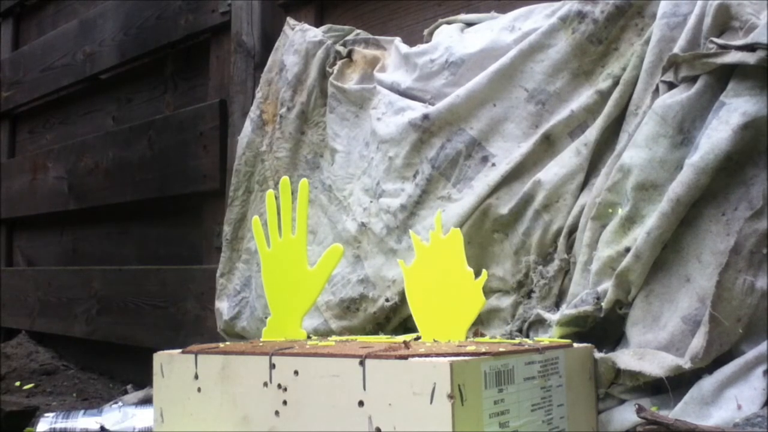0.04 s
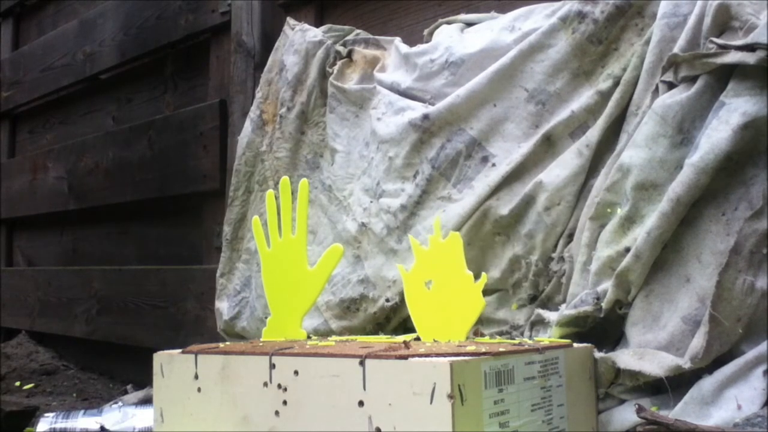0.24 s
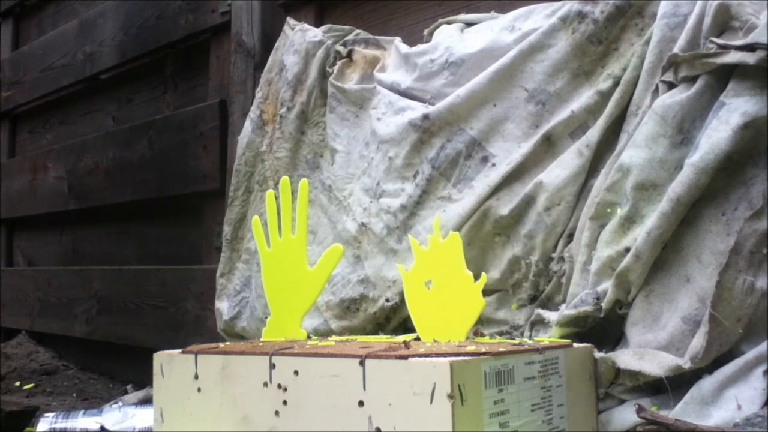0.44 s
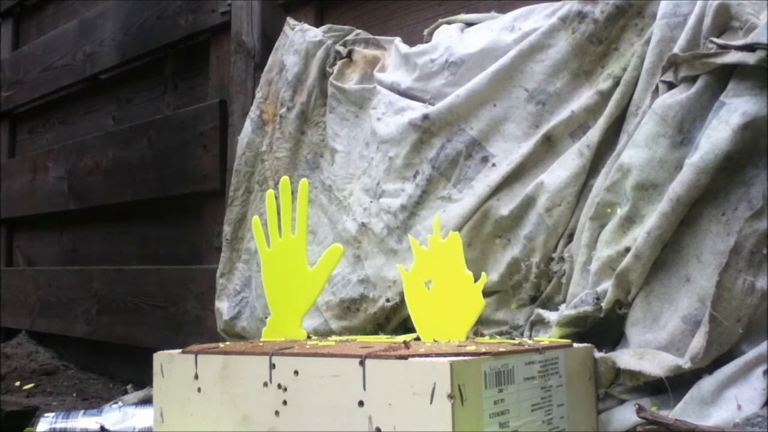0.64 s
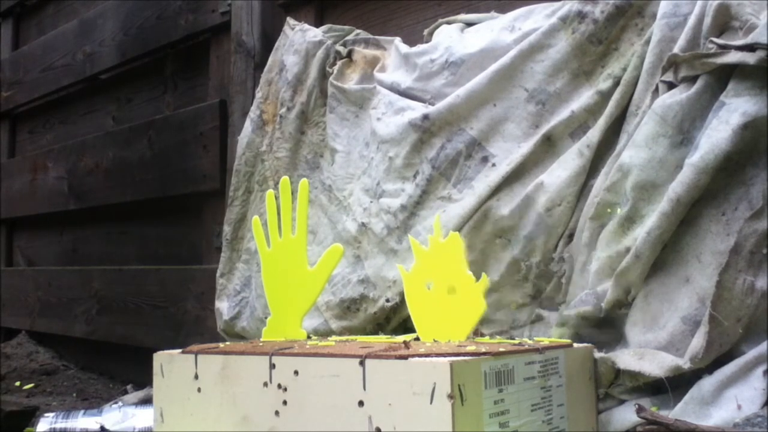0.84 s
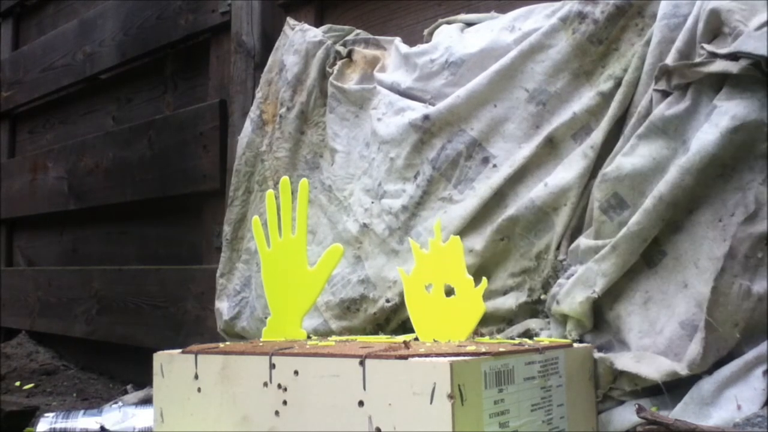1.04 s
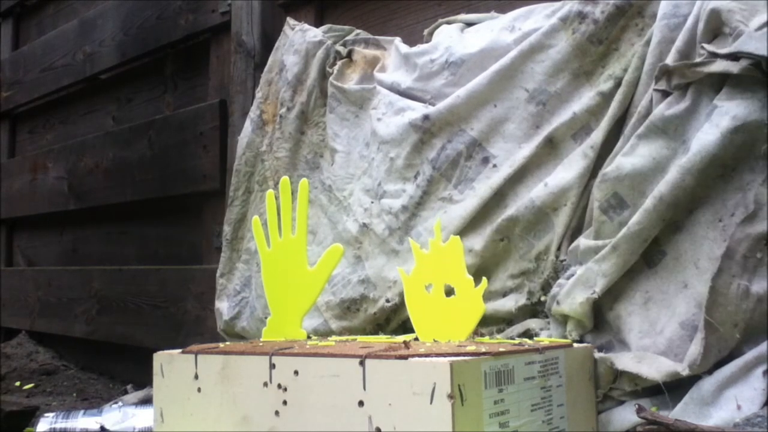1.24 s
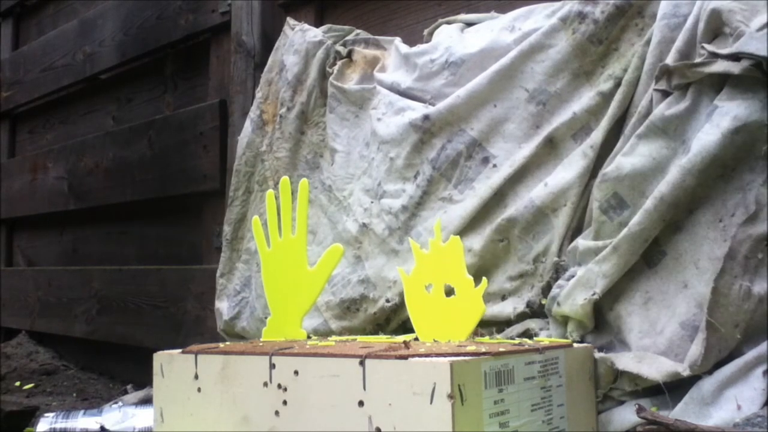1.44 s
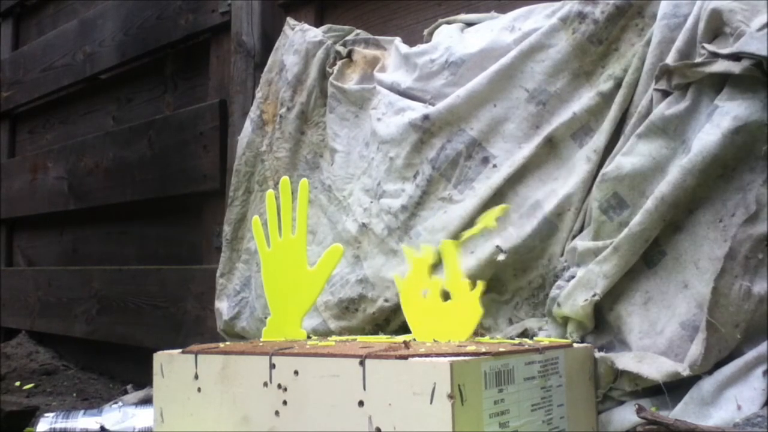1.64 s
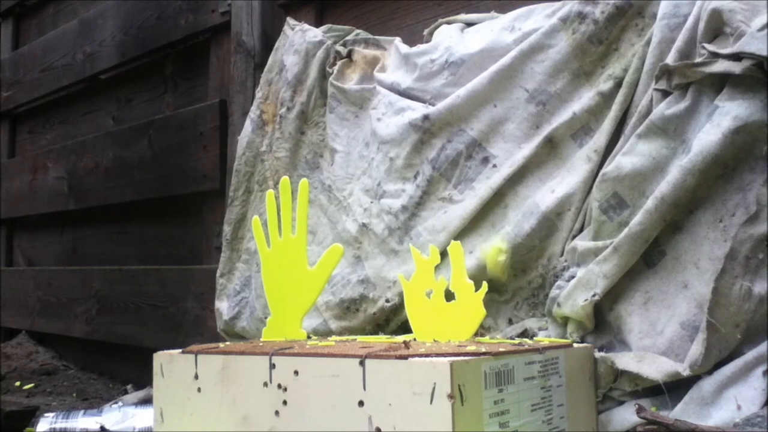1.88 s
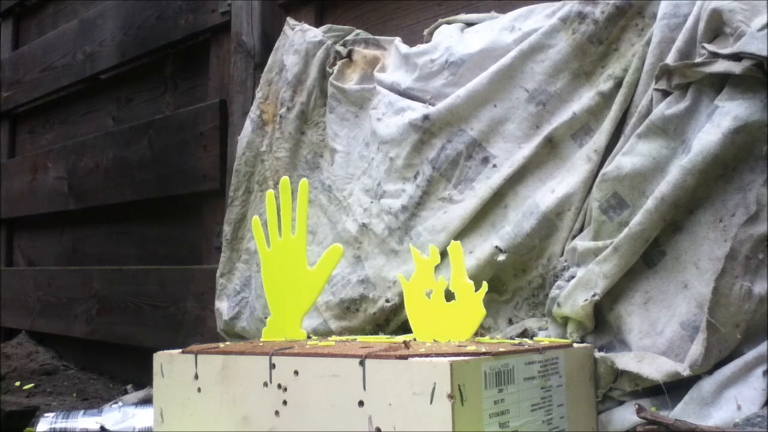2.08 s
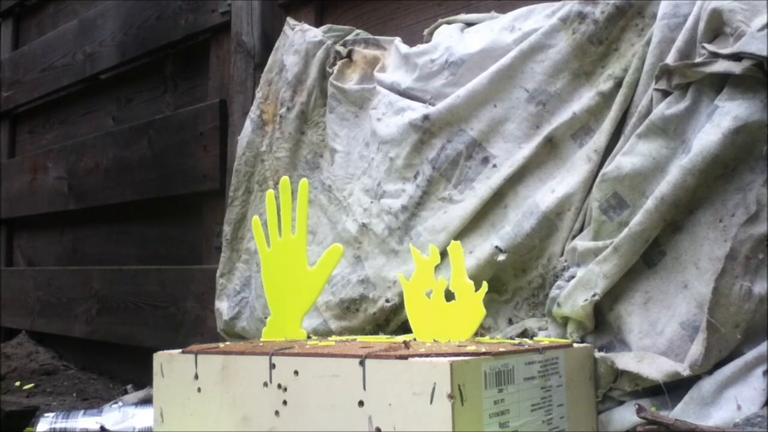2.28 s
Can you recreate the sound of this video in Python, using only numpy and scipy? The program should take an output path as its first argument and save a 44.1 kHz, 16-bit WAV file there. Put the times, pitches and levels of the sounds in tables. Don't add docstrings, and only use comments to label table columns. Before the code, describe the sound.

Air gun fires three times in a fenced yard, each snap smacking plastic and thumping a box

```python
import sys
import numpy as np
from scipy import signal
from scipy.fft import rfft, irfft, next_fast_len
from scipy.io import wavfile
from scipy.ndimage import uniform_filter1d, map_coordinates

SR = 44100
rng = np.random.default_rng(int(sys.argv[2]) if len(sys.argv) > 2 else 0)


def log_audio(samples):
    frames = np.atleast_2d(samples).T
    limited = np.clip(frames, -1, 1)
    pcm = np.round(limited * 32767).astype(np.int16)
    wavfile.write(sys.argv[1], SR, pcm)


def magnitude_from_level(level_db):
    exponent = np.asarray(level_db, float) / 20
    return 10 ** exponent


N = 101430


def unit(x):
    return x / np.sqrt(np.mean(x ** 2) + 1e-20)


def along(points, hz):
    f, value = np.transpose(points)
    return np.interp(np.log(hz + 1), np.log(f + 1), value)


def filtered(x, response):
    size = x.shape[-1]
    m = next_fast_len(size + 8192)
    spectrum = rfft(x, m) * response(np.fft.rfftfreq(m, 1 / SR))
    return irfft(spectrum, m)[..., :size]


def noise(spectrum, size):
    return unit(filtered(rng.standard_normal(size), lambda hz: magnitude_from_level(along(spectrum, hz))))


def narrow(hz, width_hz, size):
    peak = lambda f: 1 / (1 + ((f - hz) / (width_hz / 2)) ** 2)
    return unit(filtered(rng.standard_normal(size), peak))


def fade(t, t60, rise_s):
    return magnitude_from_level(-60 * t / t60) * (1 - np.exp(-t / rise_s))


def ring(modes, t, rise_s, scatter_db):
    out = np.zeros(len(t))
    for hz, db, t60 in modes:
        level = magnitude_from_level(db + scatter_db * rng.normal())
        out += level * fade(t, t60, rise_s) * np.sin(2 * np.pi * hz * t)
    return out


def add(track, s, sound):
    part = track[round(s * SR):][:len(sound)]
    part += sound[:len(part)]


# (frequency [Hz], level [dB])
SPRING_SPECTRUM = [(60, -19.5), (300, -7), (2700, -6.5), (3800, -2), (6300, -8.5), (7400, -10.5),
                   (9800, -12), (15500, -15.5)]


def spring(t):
    return magnitude_from_level(-15) * fade(t, t60=0.16, rise_s=0.0021) * noise(SPRING_SPECTRUM, size=len(t))


def muzzle_pop(t):
    u = t / .00006
    return magnitude_from_level(-2.5) * (u - 2) * u * np.exp(-u) * 2


def barrel_puff(t):
    return ring([(110, -26.5, 0.032)], t, rise_s=.002, scatter_db=1.5)


# (delay after the pop [s], level [dB])
CLINK_ARRIVALS = [
    (.0035, 0),
    (.0056, -6),
]
# (frequency [Hz], level [dB], t60 [s])
CYLINDER_MODES = [(9500, -1, .0045), (5900, -9, .004), (10500, -7, .0045), (8400, -9, .0045),
                  (14500, -14, .004)]


def piston_clinks(t):
    out = np.zeros(len(t))
    for delay, db in CLINK_ARRIVALS:
        add(out, delay, magnitude_from_level(db) * ring(CYLINDER_MODES, t, rise_s=.0002, scatter_db=1))
    return out


SPLIT_DELAYS = [.0127, .0139, .0154]
# (level [dB], t60 [s])
SPLIT_BURSTS = [
    (3, .006),
    (-6, .012),
    (-7.5, 0.022),
]
# (frequency [Hz], level [dB])
PLASTIC_SPECTRUM = [(200, -25), (700, -11.5), (1900, -2), (4000, -2.5), (6100, -8), (8200, -0.5),
                    (12500, -9.5), (16000, -9)]


def plastic_cracks(t):
    out = np.zeros(len(t))
    for delay, (db, t60) in zip(SPLIT_DELAYS, SPLIT_BURSTS):
        add(out, delay, magnitude_from_level(db) * fade(t, t60, rise_s=.00005) * noise(PLASTIC_SPECTRUM, size=len(t)))
    snap = ring([(3666, -4, 0.0088)], t, rise_s=.00003, scatter_db=1)
    add(out, SPLIT_DELAYS[0], -snap)
    return out


# (frequency [Hz], level [dB], t60 [s])
BOOM_MODES = [(176, -0.5, 0.027), (124, -12, 0.044), (269, -5.5, 0.041)]


def box_boom(t):
    return -ring(BOOM_MODES, t, rise_s=0.0011, scatter_db=0.5)


# (frequency [Hz], level [dB], t60 [s])
BOX_MODES = [(506, 2.5, 0.019), (413, -4.5, 0.015), (676, -5, 0.029), (1300, -3.5, .015)]


def box_thump(t):
    return magnitude_from_level(-11) * ring(BOX_MODES, t, rise_s=0.00045, scatter_db=1)


# (frequency [Hz], width [Hz], level [dB], t60 [s])
PANELS = [(607, 53, -40.5, 0.54), (1566, 240, -35.5, 0.34), (382.4, 230, -41, 0.23)]


def panel_buzz(t):
    out = np.zeros(len(t))
    for hz, width_hz, db, t60 in PANELS:
        out += magnitude_from_level(db) * fade(t, t60, rise_s=0.0057) * narrow(hz, width_hz, size=len(t))
    return out


def shot(gun_db, crack_db, thump_db, boom_db):
    t = np.arange(SR) / SR
    pop_s = .0058
    out = magnitude_from_level(gun_db) * (spring(t) + barrel_puff(t))
    add(out, pop_s, magnitude_from_level(gun_db) * (muzzle_pop(t) + piston_clinks(t)))
    add(out, pop_s, magnitude_from_level(crack_db) * plastic_cracks(t))
    add(out, pop_s + .0128, magnitude_from_level(boom_db) * box_boom(t))
    add(out, pop_s + .0146, magnitude_from_level(thump_db) * box_thump(t) + panel_buzz(t))
    return out


# (frequency [Hz], t60 [s])
NEAR_DECAY = [(100, 0.28), (500, 0.63), (1500, 0.23), (4000, .27), (10000, .25), (16000, 0.067)]
# (frequency [Hz], t60 [s])
FAR_DECAY = [(300, 2.7), (2000, 1.3), (6000, .8), (14000, 0.33)]
# (frequency [Hz], level [dB])
ECHO_TINT = [(60, -11.5), (250, 0.5), (600, -8), (1500, 2), (4000, -1), (8000, -1), (12000, -5.5),
             (16000, -3)]


def yard(x):
    echo_db, far_db, fence_s = -7.5, -26, 0.0015
    lumps_db = 2.2
    hz, t, z = signal.stft(rng.standard_normal(len(x)), SR, nperseg=128)
    near = magnitude_from_level(-120 * t / along(NEAR_DECAY, hz)[:, None])
    far = magnitude_from_level(2 * far_db - 120 * t / along(FAR_DECAY, hz)[:, None])
    decay = near + far
    bang_power = np.abs(uniform_filter1d(x ** 2, size=64))
    power = np.interp(t - fence_s, np.arange(len(x)) / SR, bang_power)
    spread = signal.fftconvolve(decay / decay.sum(axis=1).mean(), power[None], axes=1)[:, :len(t)]
    lumps = uniform_filter1d(rng.standard_normal(z.shape), size=4, axis=0)
    lumps = unit(uniform_filter1d(lumps, size=9, axis=1))
    tint_db = echo_db + along(ECHO_TINT, hz)[:, None] + lumps_db * lumps
    gain = magnitude_from_level(tint_db) * np.sqrt(np.abs(spread))
    return signal.istft(z * gain, SR, nperseg=128)[1]


# (pop time [s], gun level [dB], crack level [dB], thump level [dB], boom level [dB])
SHOT_EVENTS = [
    (0.209, 1.5, -4.5, -2.5, -10.5),
    (0.979, 1.5, -3.5, -9.5, -17),
    (1.71, 0.5, -4, -0.5, -26),
]


def gun():
    out = np.zeros(N)
    for s, *levels_db in SHOT_EVENTS:
        bang = shot(*levels_db)
        start = s - .0058
        add(out, start, bang)
        add(out, start, yard(bang))
    return out


# (time [s], level [dB], frequency [Hz], width as share of it, t60 [s])
SPLINTER_FALLS = [(2.0685, -47, 2800, .4, .025), (2.0700, -53, 5500, .6, .015),
                  (2.0690, -50, 1300, .6, .03), (2.0970, -44, 900, .6, .02), (2.1125, -42, 2600, .8, .015),
                  (2.1130, -48, 4700, .4, .012), (2.1135, -41, 1400, .7, .035),
                  (2.1230, -41, 1700, .6, .02), (2.1340, -47, 2900, .25, .035),
                  (2.1710, -52, 2900, .25, .04), (2.1720, -53, 650, .6, .08), (2.1830, -51, 2900, .25, .02),
                  (2.1830, -47, 700, .4, .03), (2.1000, -50, 650, .3, .15)]


def splinters():
    out, t = np.zeros(N), np.arange(SR // 8) / SR
    for s, db, hz, share, t60 in SPLINTER_FALLS:
        knock = narrow(hz, share * hz, size=len(t)) * fade(t, t60, rise_s=.0004)
        tick = magnitude_from_level(-13) * fade(t, 0.013, rise_s=.0001) * rng.standard_normal(len(t))
        add(out, s, magnitude_from_level(db) * (knock + tick))
    return out


# (frequency [Hz], level [dB], t60 [s])
JINGLE_MODES = [(7400, 0, .08), (9700, 0, .07), (10600, -4, .05), (12600, -3, .06), (15200, -3, .04),
                (8800, -8, .09)]
# (frequency [Hz], level [dB], t60 [s])
TICK_MODES = [(11000, 0, .0012), (14500, -2, .001), (7500, -6, .001), (9000, -18, .02), (12500, -20, .03)]


def spent_pellet():
    out, t = np.zeros(N), np.arange(SR // 8) / SR
    fizz = noise([(4500, -30), (7000, -1), (16000, -3)], size=len(t))
    fizz = magnitude_from_level(3) * fade(t, .08, rise_s=.0008) * fizz
    jingle = ring(JINGLE_MODES, t, rise_s=.0015, scatter_db=1)
    add(out, 1.3648, magnitude_from_level(-54) * (jingle + fizz))
    add(out, 1.4035, magnitude_from_level(-37) * ring(TICK_MODES, t, rise_s=.00002, scatter_db=0))
    return out


# (start [s], end [s], gain [dB])
GAIN_DIPS = [
    (0.214, 0.643, -4.5),
    (1.005, 1.483, -6),
    (1.703, 2.4, -5.5),
]


def camera_gain_db():
    t, gain_db = np.arange(N) / SR, np.zeros(N)
    for start, end, db in GAIN_DIPS:
        gain_db[(t > start) & (t < end)] = db
    return uniform_filter1d(gain_db, size=90)


# (frequency [Hz], level per Hz [dB])
MURMUR_SPECTRUM = [(25, -16.5), (60, -6.5), (125, 1.5), (200, -4), (270, -2.5), (620, -5), (1000, -9.5),
                   (1800, -17.5)]


def murmur(gain_db):
    sway = map_coordinates(rng.standard_normal(40), [np.arange(N) * 12 / SR])
    low = filtered(noise(MURMUR_SPECTRUM, size=N), lambda hz: 1 / (1 + (hz / 2560) ** 2))
    return magnitude_from_level(-49 + 0.76 * sway + gain_db) * low


# (frequency [Hz], level per Hz [dB])
HISS_SPECTRUM = [(500, 0), (3000, -0.5), (8000, -0.5), (12000, -3.5), (15300, -5), (16000, -6.5)]


def electronics(gain_db):
    hiss = magnitude_from_level(-59) * noise(HISS_SPECTRUM, size=N)
    whine_hz, width_hz = 15100, 200
    band = lambda hz: np.exp(-((hz - whine_hz) / width_hz) ** 2)
    whine = magnitude_from_level(-74) * unit(filtered(rng.standard_normal(N), band))
    return magnitude_from_level(1.45 * gain_db) * (hiss + whine)


def scene():
    gain_db = camera_gain_db()
    return (gun() + splinters() + spent_pellet() + murmur(gain_db) + electronics(gain_db))[None]


# (start [s], end [s])
SILENCES = [
    (0.964, 0.970),
    (1.6925, 1.700),
]


def gate():
    t = np.arange(N) / SR
    closed = np.any([(t > a) & (t < b) for a, b in SILENCES], axis=0)
    return uniform_filter1d(1. * ~closed, size=40)


def below(hz, top_hz):
    return .5 - .5 * np.tanh((hz - top_hz) / 60 / 2)


def top_cut(x):
    return signal.sosfilt(signal.butter(12, 16820, fs=SR, output="sos"), x)


def record(dry):
    opened = gate()
    bass_hz, clip_top, clip_hard = 55, 1.05, 6
    x = filtered(dry, lambda hz: below(hz, 15900) * 1j * hz / (bass_hz + 1j * hz)) * opened
    x = x / (1 + np.abs(x / clip_top) ** clip_hard) ** (1 / clip_hard)
    x = filtered(x, lambda hz: below(hz, 16600)) * opened
    return top_cut(x)


dry = scene()
out = record(dry)
log_audio(out)
```